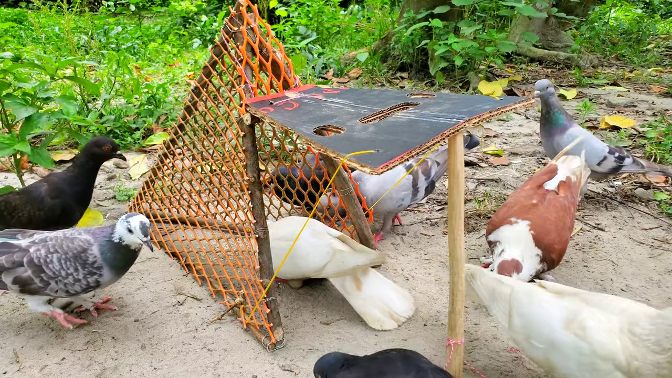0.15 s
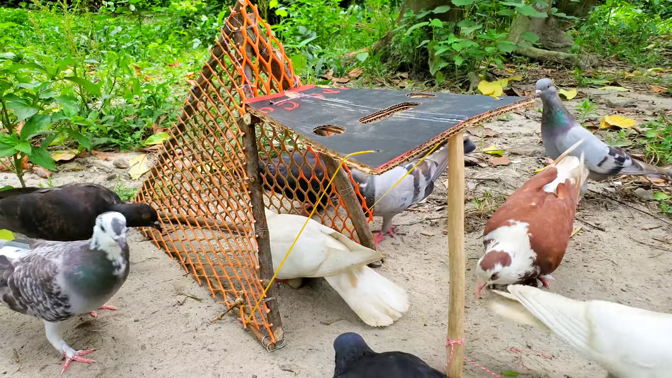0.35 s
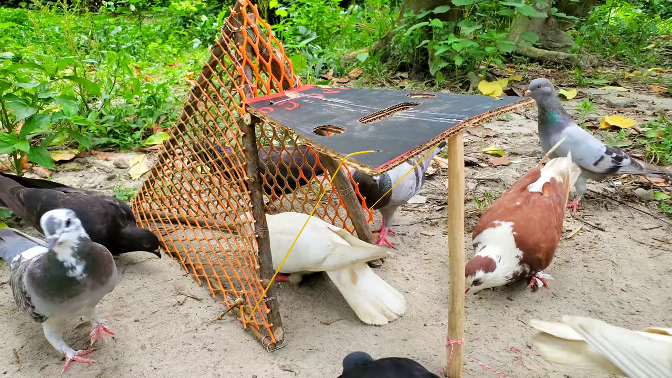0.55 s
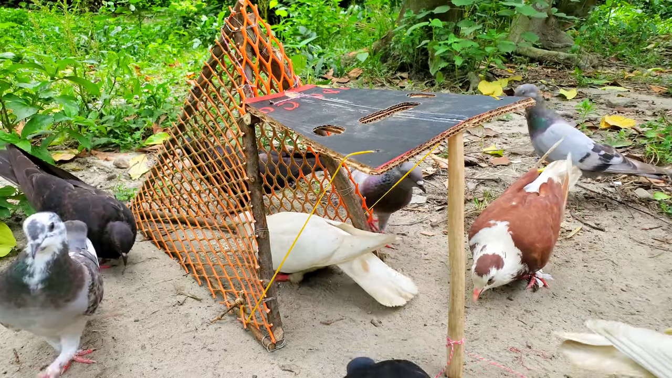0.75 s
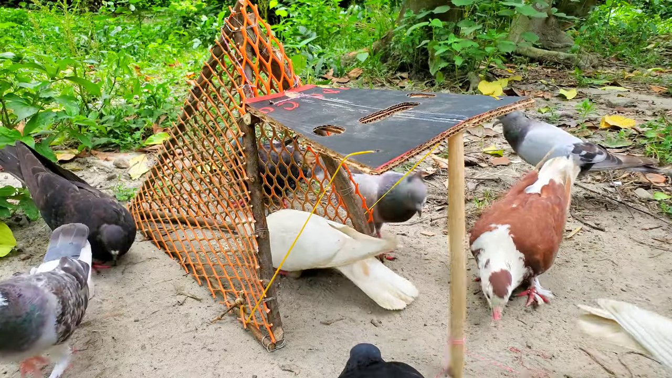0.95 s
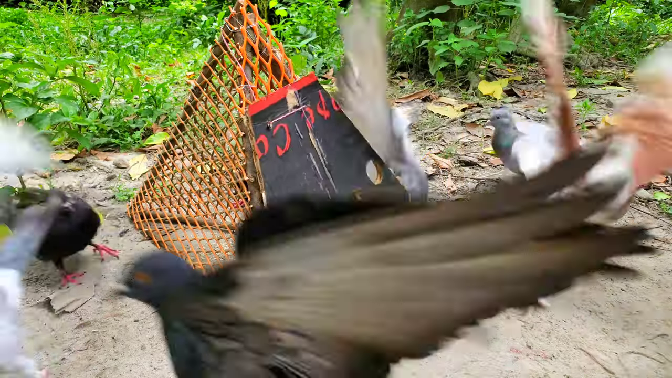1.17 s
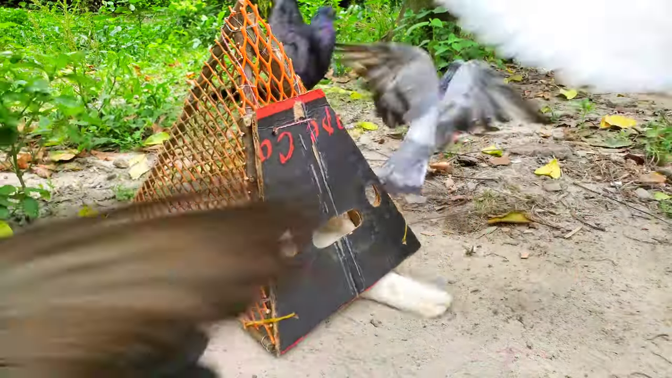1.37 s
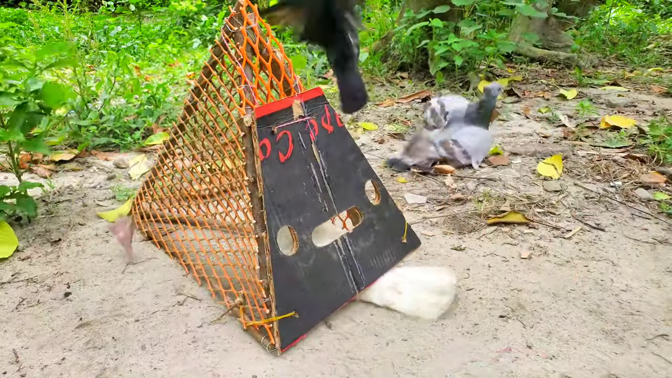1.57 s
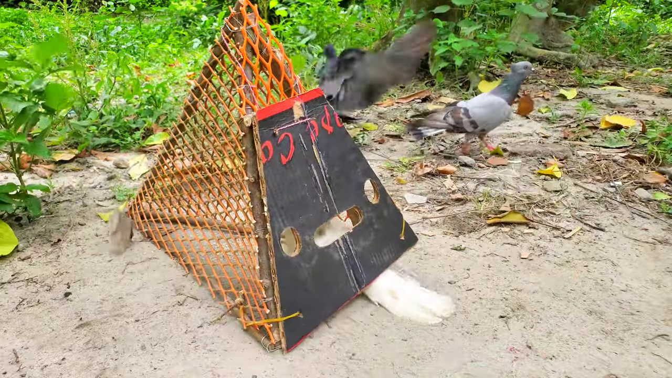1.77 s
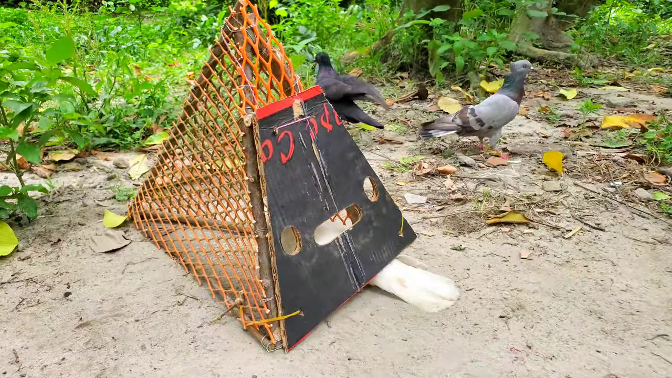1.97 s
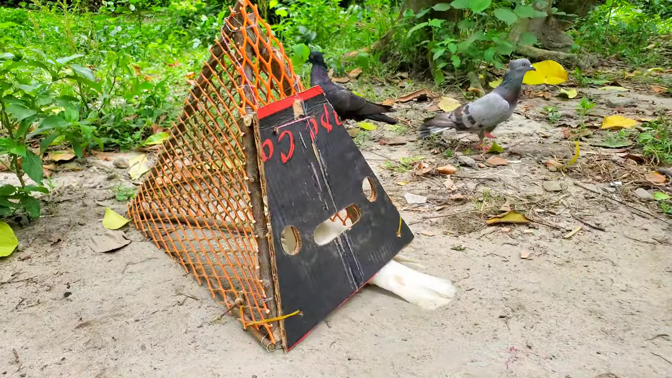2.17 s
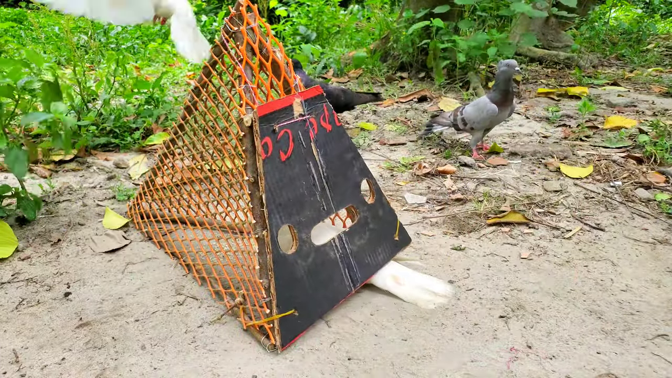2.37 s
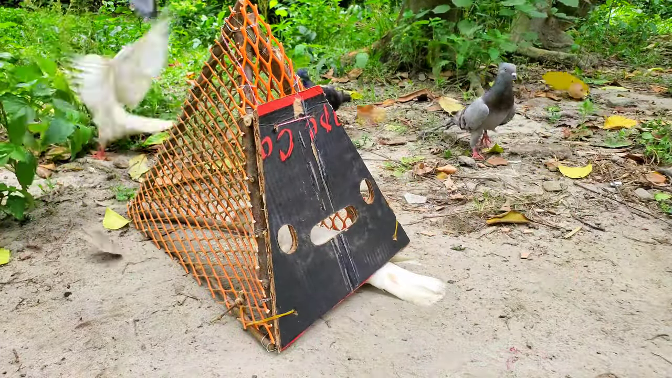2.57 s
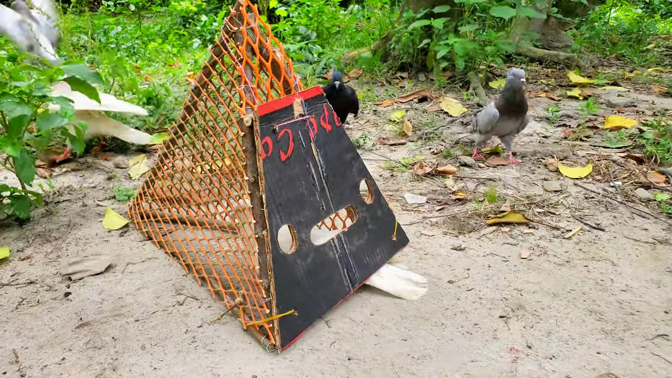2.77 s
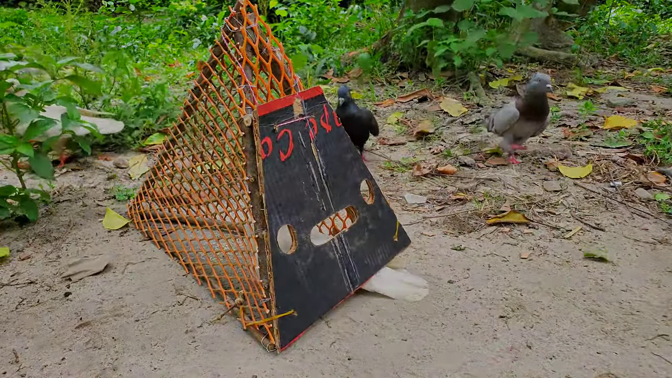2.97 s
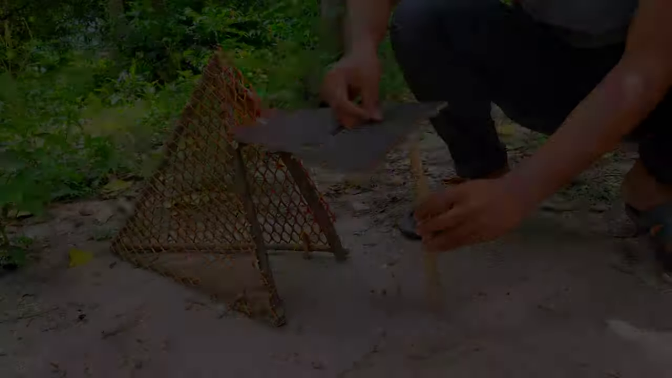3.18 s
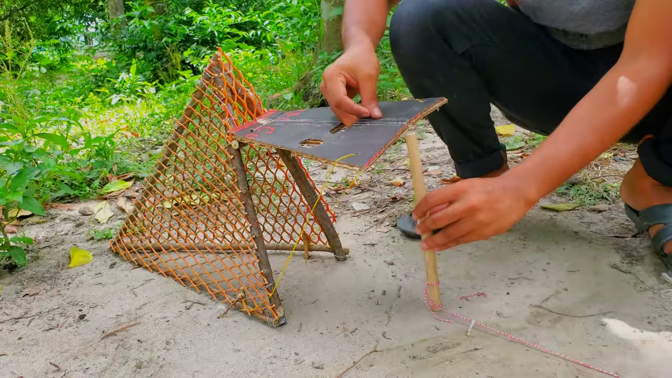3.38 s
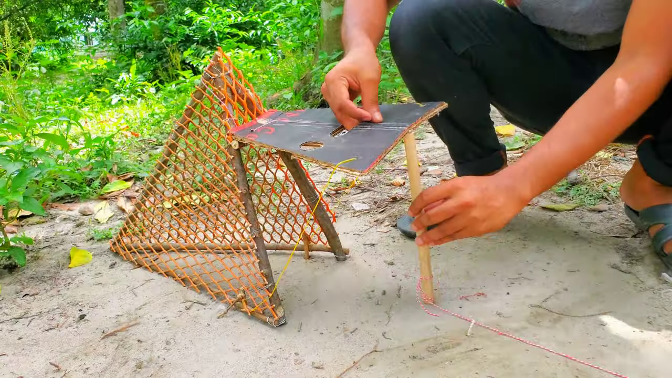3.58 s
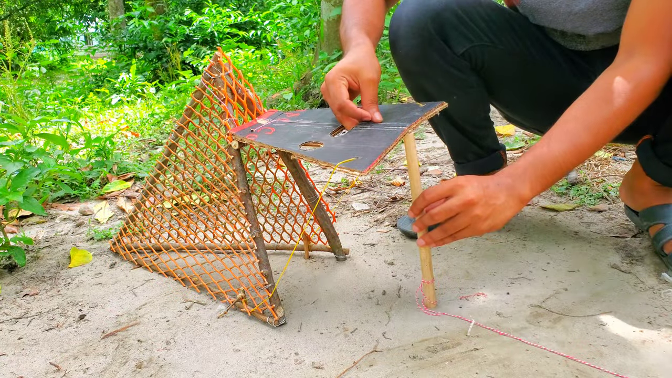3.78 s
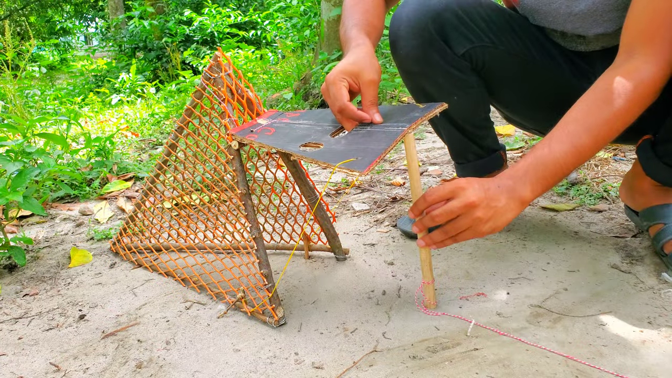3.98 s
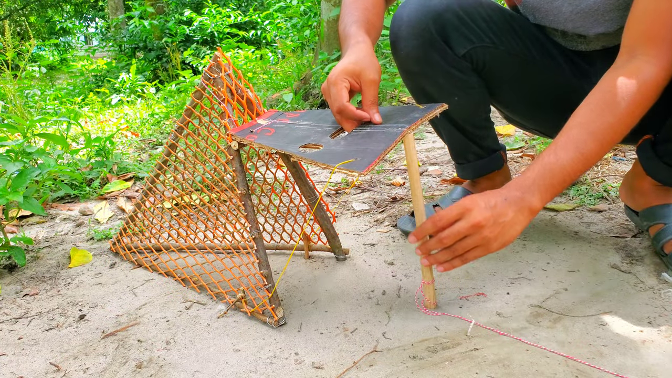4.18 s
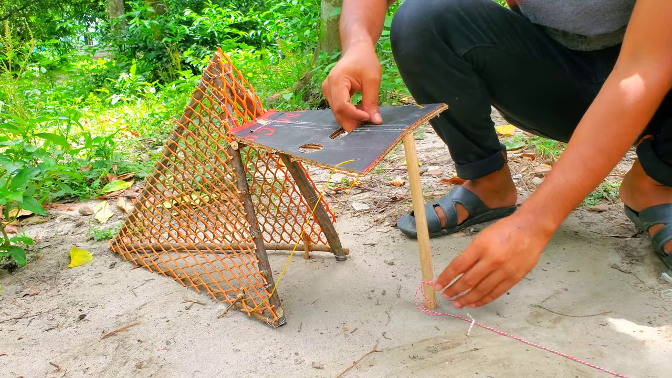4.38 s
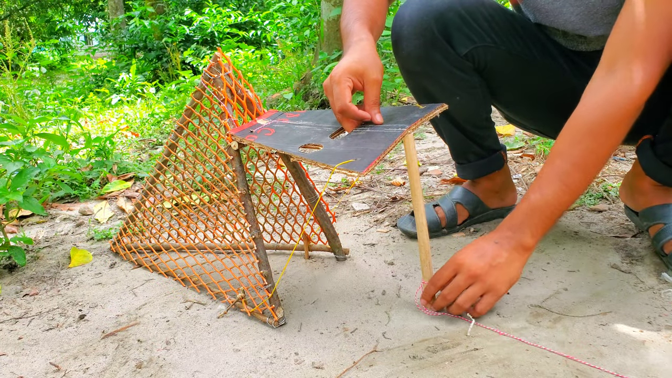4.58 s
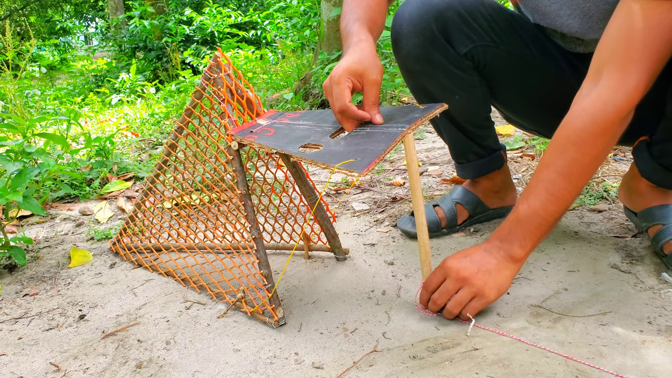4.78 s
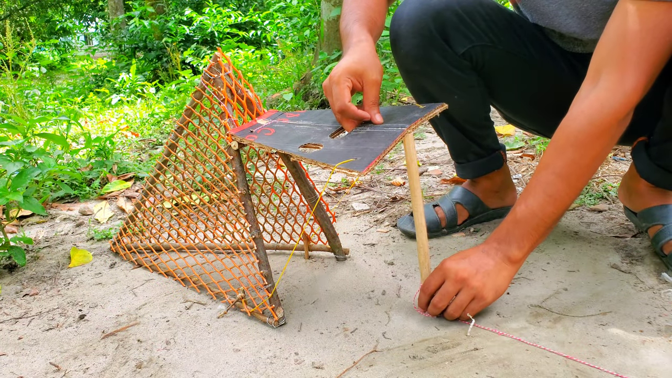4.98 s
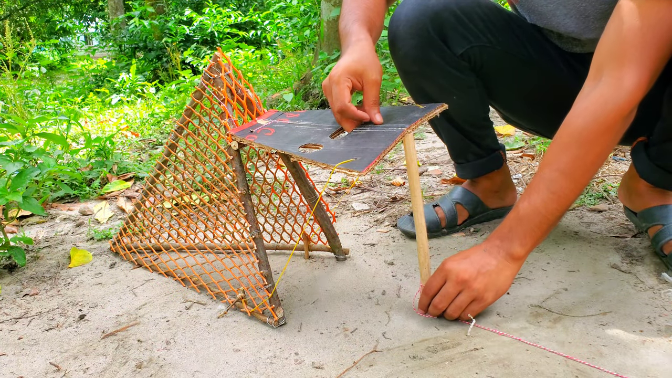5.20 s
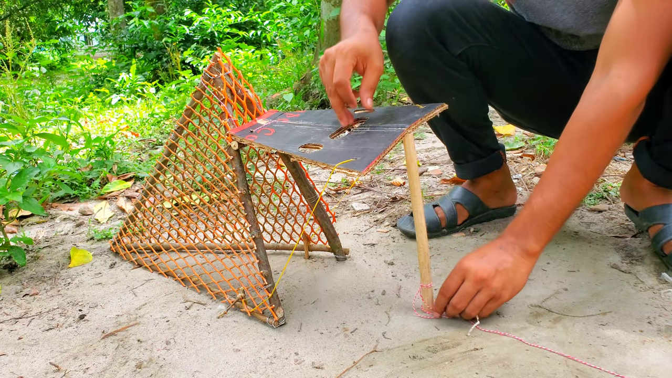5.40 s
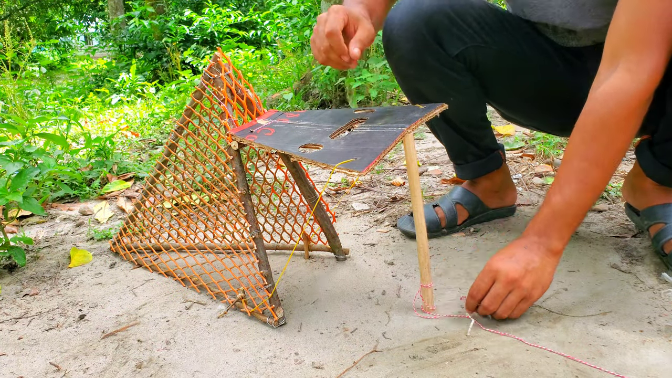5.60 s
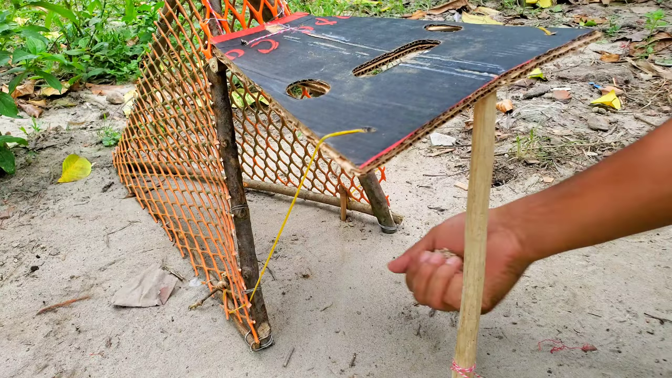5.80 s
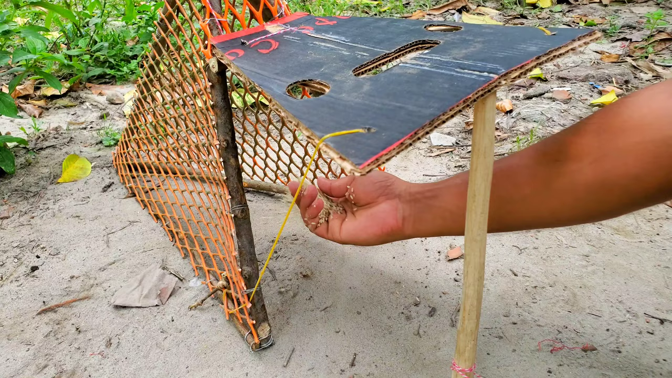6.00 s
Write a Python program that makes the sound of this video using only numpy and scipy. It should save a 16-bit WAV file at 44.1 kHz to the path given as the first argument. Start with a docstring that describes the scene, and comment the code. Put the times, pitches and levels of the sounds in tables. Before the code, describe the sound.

From 0 to 1 s it is very quiet: distant low rumble, faint leaf hiss, far twitter and one bird's short phrase repeating gradually louder, with slight rustling on sand. At about 1.07-1.12 s a thin board door lands in a rapid, dry, woody chatter. From 1.2 s pigeons explode upward very close: hard wing claps, dense feather rush and crackle, strongest around 1.2-1.6 s. Low pressure thumps buffet the microphone until about 1.9 s, some strongly left. Small flutters and rustles weaken until 3 s, while chirps emerge. The rumble dips away near 3.2 s, then returns with brighter leaf hiss. From 3.4 to 6 s small birds call busily: short falling slurs, rising hooks, thin whistles and peeps, mostly 2-8 kHz, with long echoes among trees. A sharp dry tick comes at 4.4 s, amid faint rustling.

```python
"""Low outdoor rumble, leaf hiss and far twitter come first: shaped noise and short gliding sines.
Small birds chirp in echoing trees: warbled sines, direct and through decaying noise echoes.
A stick is jerked away and the board door of a net trap slams on bare earth: damped modes, noise ticks.
Pigeons burst up close by: wing claps and feather rustle of decaying or patchy noise,
and downstrokes that push short pressure swings at the microphone."""
import sys
import numpy as np
from scipy import signal
from scipy.fft import rfft, irfft
from scipy.io import wavfile
from scipy.ndimage import uniform_filter1d

SR = 44100
rng = np.random.default_rng(int(sys.argv[2]) if len(sys.argv) > 2 else 0)


def digitize_waveform(pressure):
    """Quantize a signal to 16-bit integers and store it at the path in sys.argv[1].

    Rows of a 2-D input are taken as channels; values are limited to [-1, 1].
    """
    field = np.atleast_2d(pressure).T
    bounded = np.clip(field, -1, 1)
    quanta = np.round(bounded * 32767).astype(np.int16)
    wavfile.write(sys.argv[1], SR, quanta)


N = 266760
TIME_S = np.arange(N) / SR

# rumble level, with a brief dip [start_s, level_db]
RUMBLE_LEVEL = [(0, -55.5), (1, -53.5), (2.4, -56.5), (2.9, -60), (3.18, -84), (3.44, -55.5), (6.05, -50.5)]
# rumble spectrum [freq_hz, relative_db]
RUMBLE_SPECTRUM = [(20, -32), (48, 1), (84, 4.5), (130, -5.5), (200, -11), (344, -13), (555, -21),
                   (800, -31), (1200, -43), (2600, -73)]
# leaf hiss level [start_s, level_db]
BREEZE_LEVEL = [(0, -69.5), (.9, -62.5), (2.5, -62), (3.1, -65.5), (3.45, -54.5), (4.7, -54.5), (5, -53),
                (6.05, -50)]
# leaf hiss spectrum [freq_hz, relative_db]
HISS_SPECTRUM = [(300, -23), (600, -9), (1000, -7), (1500, -3.5), (4000, -0.5), (7000, -8), (10000, -28),
                 (16000, -41)]
# spells of rustling on sand and dry leaves [start_s, length_s, level_db]
SHUFFLES = [(0.77, 0.23, -65.5), (2.2, 0.86, -63.5), (3.335, 0.7, -68), (4.827, 0.52, -64.5),
            (5.276, 0.68, -68.5), (5.774, 0.21, -59.5)]
# rustle spectrum [freq_hz, relative_db]
RUSTLE_SPECTRUM = [(500, -18), (2000, 6.5), (6000, 5), (9000, 11.5), (12000, 2.5), (16000, -1)]
# echo decay among the trees [freq_hz, t60_s]
TREE_DECAY = [(300, 0.41), (2000, 1.54), (4000, 1.11), (7000, 0.58), (10000, 0.6)]
# farthest birds [start_s, level_db]
CHORUS_LEVEL = [(0, -78), (.4, -54.5), (1.1, -44), (1.9, -59), (2.4, -55.5), (3.2, -57), (3.6, -47.5),
                (4.8, -63), (6.05, -72)]
# held, warbling whistles [start_s, length_s, pitch_hz, echo_level_db, warble_share_of_pitch]
WHISTLES = [(0.113, 0.23, 4340, -65.5, 0.077), (.575, 0.097, 7000, -66, 0.008),
            (1.559, 0.092, 3706, -38, 0.065), (2.356, .04, 5960, -52, 0.047),
            (2.446, 0.19, 4750, -46, 0.085), (2.464, 0.023, 6820, -51, 0.036),
            (2.623, 0.18, 6960, -48, 0.03), (2.708, .05, 8920, -55.5, 0.0036),
            (2.787, 0.071, 8140, -39.5, .003), (3.084, 0.045, 3577, -44, 0.049),
            (3.305, 0.024, 4046, -34, .005), (3.68, .026, 4870, -34.5, 0.032),
            (3.986, 0.18, 7970, -42.5, 0.034), (3.992, 0.22, 7000, -43.5, 0.029),
            (4.267, 0.13, 7330, -41.5, 0.03), (5.015, 0.128, 3464, -37.5, 0.035),
            (5.026, 0.087, 2844, -38, 0.074), (5.575, 0.063, 2791, -33, 0.044),
            (5.82, 0.044, 2860, -34.5, 0.058)]
# short peeps of nearer birds [start_s, length_s, pitch_hz, echo_level_db]
PEEPS = [(2.074, 0.01, 3120, -38.5), (2.204, 0.011, 2755, -41), (2.624, .02, 7100, -40),
         (3.425, 0.032, 2440, -44), (5.12, 0.024, 4100, -47), (5.447, 0.026, 4020, -40),
         (6.012, 0.043, 3220, -32.5)]
# low sagging calls of large far birds [start_s, length_s, pitch_hz, echo_level_db]
HOOTS = [(.34, .18, 330.2, -61.5), (.55, 0.16, 303, -58.5), (3.28, 0.26, 1490, -62), (3.44, 0.19, 989, -66),
         (3.78, 0.064, 997, -60.5), (3.87, 0.28, 1428, -53.5), (4, 0.24, 924, -66.5),
         (4.5, 0.183, 339, -64.5), (4.97, 0.062, 975, -61), (5.63, .051, 1140, -62),
         (5.71, 0.15, 737, -64.5)]
# repeats of one far bird's phrase, each louder [start_s, echo_level_db]
PHRASES = [(.385, -59), (.572, -56), (.757, -49.5), (0.941, -48)]
# syllables [offset_s, length_s, from_hz, to_hz, relative_db, direct_over_echo_db]
SYLLABLES = [(-.03, .035, 4120, 3736, -2.5, 0.5), (0, .06, 2500, 5266, 4, -7.5),
             (0.053, .033, 3770, 1880, -2.5, 4)]
# slurs, fast at first [start_s, length_s, from_hz, to_hz, echo_level_db, direct_over_echo_db]
SLURS = [(1.129, 0.11, 4680, 3630, -44.5, -6), (1.369, 0.058, 3600, 3020, -40.5, 1),
         (2.005, 0.052, 3110, 2092, -44.5, -1), (2.144, 0.042, 2960, 1898, -45, -3.5),
         (2.607, 0.046, 5600, 7280, -37.5, -3), (2.766, 0.017, 2550, 2145, -50, 3),
         (2.847, 0.074, 7650, 5500, -37.5, -3), (3.123, 0.07, 3810, 4004, -40, 0.5),
         (3.269, 0.1, 3800, 2330, -46, 2.5), (3.47, 0.073, 2823, 3220, -35.5, -6),
         (3.778, 0.073, 4410, 3370, -30, 0.5), (3.827, .07, 3550, 2854, -32.5, 8),
         (3.854, 0.064, 5180, 3744, -31.5, -6), (3.969, 0.029, 5950, 8720, -34, -8),
         (3.989, 0.032, 3640, 2540, -35.5, -1), (4.062, 0.054, 3728, 2452, -34, -2),
         (4.254, .075, 6550, 6080, -40.5, -1), (4.332, 0.06, 2414, 2093, -39, -1.5),
         (4.379, 0.03, 12600, 9700, -44, -13), (4.64, 0.06, 2395, 2043, -38.5, 4.5),
         (4.706, 0.043, 2117, 1660, -47.5, 7), (4.831, 0.041, 3570, 5090, -40, 1),
         (5.174, 0.046, 3930, 4545, -35.5, 1), (5.198, 0.028, 4620, 5230, -38, -13),
         (5.24, 0.049, 2276, 3230, -42.5, 7), (5.257, .08, 2816, 2304, -34.5, 7.5),
         (5.315, 0.02, 1930, 1682, -38.5, -11), (5.478, 0.024, 2927, 4320, -35, 3),
         (5.505, 0.069, 2672, 2348, -32.5, 2), (5.669, 0.031, 2680, 1793, -36.5, -1),
         (5.717, 0.053, 7930, 4980, -34, -7.5), (5.801, 0.02, 2740, 1872, -38, 4.5),
         (5.852, 0.073, 7160, 5120, -35.5, -1), (5.921, 0.048, 2735, 2350, -38, -8),
         (5.985, 0.028, 3840, 2800, -29.5, -6)]
# rise-and-fall hooks [start_s, length_s, foot_hz, peak_hz, echo_level_db, direct_over_echo_db]
HOOKS = [(3.44, 0.11, 1784, 2427, -38.5, 1.5), (3.606, 0.084, 3680, 5090, -29, -5.5),
         (4.147, 0.11, 1703, 3298, -36, -1), (4.458, 0.051, 3440, 4674, -34, -1.5),
         (4.536, 0.056, 2354, 3450, -35.5, 0.5), (5.433, .085, 2600, 3970, -34.5, -1.5)]
# ticks and scuffs on ground and trap [start_s, level_db, centre_hz, decay_s]
TICKS = [(.859, -46, 6300, 0.004), (1.009, -43.5, 9700, 0.03), (1.405, -32, 630, 0.033),
         (1.46, -29.5, 704, 0.029), (1.525, -30, 585, 0.0049), (1.577, -28, 680, 0.012),
         (1.603, -29, 1260, 0.0045), (1.945, -48, 680, 0.018), (2.515, -50, 1460, 0.0029),
         (3.29, -37.5, 6100, 0.0011), (4.395, -27.5, 5650, 0.0023)]
# wingbeat strength: a burst, then stragglers [start_s, level_db]
FLOCK_LEVEL = [(.98, -29.5), (1.08, -17.5), (1.2, -3.5), (1.31, 3), (1.62, -10), (1.85, -21), (2.3, -20.5),
               (2.75, -32.5), (3.0, -42.5)]
# wing rush spectrum [freq_hz, relative_db]
RUSH_SPECTRUM = [(60, 8.5), (150, 0), (260, -1), (450, 0.5), (750, -1.5), (1500, -8.5), (3100, -6),
                 (5800, -22), (9000, -21), (16000, -45.5)]
# spectrum of feather fizz and door edge ticks [freq_hz, relative_db]
FIZZ_SPECTRUM = [(1000, -23), (2500, 0.5), (5000, 4.5), (8000, -4), (12000, 3), (16000, 2)]
# draught at the microphone as the birds pass [start_s, relative_db]
DRAUGHT_LEVEL = [(1, -72), (1.19, -38), (1.5, -28), (1.72, -30.5), (1.8, -43.5), (2.4, -51), (3, -83.5)]
# spectrum of moved air [freq_hz, relative_db]
AIR_SPECTRUM = [(20, -14.5), (50, -0.5), (100, 1.5), (160, -11), (260, -9.5), (420, -36), (1000, -61.5)]
# contacts of door and prop [start_s, thud_relative_db, edge_tick_db]
DOOR_HITS = [(1.0694, -31.5, -24), (1.0941, -31.5, -20), (1.1002, -11, -25), (1.102, -13, -8),
             (1.108, -12.5, -10.5), (1.1108, -12.5, -20.5), (1.1154, -18, -19), (1.1221, -20, -14)]
# board modes [freq_hz, relative_db, t60_s]
BOARD_MODES = [(124, -16.5, 0.24), (288, -17.5, 0.044), (398, -4.5, 0.012), (564, -1, 0.03),
               (745, -4, 0.027), (1020, -1.5, 0.01), (1355, 8, 0.0017), (2100, -22.5, 0.0065)]
# wing claps [start_s, snap_db, thump_db, snap_decay_s, left_over_right_db]
CLAPS = [(1.2096, -6, -32, .00084, 12.5), (1.239, -24, -12.5, 0.0026, 1), (1.2539, -15.5, -21, 0.003, -3),
         (1.2629, -11, -10, 0.0039, -1), (1.3173, -12, -5.5, 0.0022, -1), (1.378, -19.5, -20, .0032, 2),
         (1.429, -20, -18, 0.0081, -4), (1.576, -30, -16, 0.0058, -3), (1.602, -27, -17, .0023, -3),
         (1.947, -40, -61, .0069, -5), (2.066, -37.5, -42, 0.0067, 0.5), (2.291, -36, -53, 0.0019, -8),
         (2.314, -38, -47, 0.0052, 0.5), (2.384, -45.5, -36.5, 0.023, 0), (2.578, -50, -41, .0032, -2)]
# quill snap spectrum [freq_hz, relative_db]
SNAP_SPECTRUM = [(300, -11), (800, 18), (1500, 6.5), (3000, 7.5), (6500, 7), (9000, -2.5), (16000, 4)]
# squeezed-air thump spectrum [freq_hz, relative_db]
THUMP_SPECTRUM = [(30, -42), (100, 11.5), (300, 5), (700, -10), (1300, -7), (3000, -35), (8000, -59)]
# downstrokes [centre_s, level_db, gaussian_sigma_s, swing_hz, left_over_right_db]
STROKES = [(1.293, -12, 0.012, 93.5, -1.5), (1.401, -11, 0.013, 63, 0.5), (1.506, -13.5, 0.023, 55.6, -4.5),
           (1.606, -11.5, .029, 50, 11), (1.637, -8, 0.0063, 89.5, 30), (1.689, -8, 0.0087, 77.5, 19),
           (1.84, -20.5, 0.017, 58, 0), (1.885, -23.5, 0.0082, 58.4, -2), (2.035, -38, 0.0054, 69.6, 14)]

EDGE_HZ = 16100
RUSTLE_FLOOR_DB = -74.5
BEATS_PER_S, BEAT_DB = 8.9, -0.5
GRAIN_SPREAD_DB = 2.5


def gain_of(db):
    """Decibels to gain."""
    return 10 ** (np.asarray(db) / 20)


def evened(x):
    """Scales to rms 1."""
    return x / np.sqrt(np.mean(x ** 2) + 1e-20)


def read(points, hz):
    """Reads a table on a log-frequency axis."""
    table_hz, value = np.transpose(points)
    return np.interp(np.log(hz + 1), np.log(table_hz + 1), value)


def level(rows):
    """Level table to gain per sample, silent before its first row."""
    s, db = np.transpose(rows)
    return gain_of(np.interp(TIME_S, s, db)) * (TIME_S >= s[0])


def add(mix, start_s, sound):
    """Mixes a sound in at start_s."""
    part = mix[:, max(round(start_s * SR), 0):][:, :sound.shape[-1]]
    part += sound[..., :part.shape[1]]


def pan(left_over_right_db):
    """Left and right gains of equal total power."""
    half_db = left_over_right_db / 2
    return evened(gain_of([[half_db], [-half_db]]))


def wander(hz, size=N):
    """Slow chance of rms 1: random knots, hz of them a second, joined by lines."""
    knots = rng.standard_normal(4096)
    return evened(np.interp(np.arange(size) * hz / SR, np.arange(len(knots)), knots))


def colour(x, spectrum):
    """Filters x by a spectrum, to rms 1."""
    size = x.shape[-1]
    gain = gain_of(read(spectrum, np.fft.rfftfreq(size, 1 / SR)))
    return evened(irfft(rfft(x) * gain, size))


def noise(spectrum, apart, size=N):
    """Stereo noise: a shared part and an opposed part of relative size apart."""
    mid, side = rng.standard_normal((2, size))
    return colour(np.array([mid + apart * side, mid - apart * side]), spectrum)


def swirl(x, patchy_db=4.0):
    """Favours ever-changing pitches: patches some 300 Hz wide and 25 ms long."""
    z = signal.stft(x, SR, nperseg=512, noverlap=384)[2]
    patches = uniform_filter1d(rng.standard_normal(z.shape[1:]), size=4, axis=0)
    patches = evened(uniform_filter1d(patches, size=9, axis=1))
    patchy = signal.istft(z * gain_of(patchy_db * patches), SR, nperseg=512, noverlap=384)[1]
    return evened(patchy[:, :N])


def outdoors(lump_db=2.5, flick_db=2, shuffle_taper=0.4):
    """Lumpy distant rumble, faint leaf hiss and the dry rustle of small movements on sand."""
    lumps = gain_of(lump_db * wander(9.8))
    rumble = level(RUMBLE_LEVEL) * lumps * noise(RUMBLE_SPECTRUM, 0.23)
    hiss = level(BREEZE_LEVEL) * swirl(noise(HISS_SPECTRUM, 0.97), patchy_db=6.5)
    rustle_gain = np.full((1, N), gain_of(RUSTLE_FLOOR_DB))
    for start_s, length_s, db in SHUFFLES:
        add(rustle_gain, start_s, gain_of(db) * signal.windows.tukey(round(length_s * SR), shuffle_taper))
    flicks = gain_of(flick_db * wander(90))
    return rumble + hiss + rustle_gain * flicks * noise(RUSTLE_SPECTRUM, 0.15)


def trees(x, early_db=-5):
    """Trunks and leaves scatter sound: a few early echoes and a long tail, different at each ear."""
    t = np.arange(SR) / SR
    hz, frame_s, z = signal.stft(rng.standard_normal((2, SR)), SR, nperseg=256)
    decay = gain_of(-60 * frame_s / read(TREE_DECAY, hz)[:, None])
    tail = signal.istft(z * decay, SR, nperseg=256)[1][:, :SR]
    tail *= 1 - np.exp(-t / 0.012)
    tail /= np.linalg.norm(tail[0])
    for ear in tail:
        echo_at = (rng.uniform(.008, .07, 8) * SR).astype(int)
        ear[echo_at] += gain_of(early_db) * rng.choice([-1, 1], 8) / np.sqrt(8)
    return signal.fftconvolve(x[None], tail, axes=1)[:, :N]


def chorus(count=240, low_hz=3200, high_hz=4500, glide=0.18, left_db=2):
    """Many tiny twitters from deep in the trees, sliding up or down, heard only as echo."""
    song, u = np.zeros((1, N)), np.linspace(-1, 1, round(0.018 * SR))
    for k, (late, pitch, slope) in enumerate(rng.random((count, 3))):
        centre_hz = low_hz + pitch * (high_hz - low_hz)
        hz = centre_hz * (1 + glide * np.sign(slope - .5) * u)
        twitter = np.sin(2 * np.pi * np.cumsum(hz) / SR) * (1 - u ** 2)
        add(song, (k + late) / count * N / SR, twitter)
    return pan(left_db) * level(CHORUS_LEVEL) * evened(trees(song[0]))


def progress(length_s):
    """Runs from 0 to 1 over a note."""
    return np.linspace(0, 1, round(length_s * SR))


def note(hz, db, warble, waver=0.005, flutter_db=2, overtone_db=-52, warble_hz=115):
    """Near sine on a pitch path; warble and waver are shares of the pitch, the level flutters."""
    size = len(hz)
    warble_phase = 2 * np.pi * warble_hz * np.arange(size) / SR + wander(90, size=size)
    shake = waver * wander(496, size=size) + warble * np.sin(warble_phase)
    phase = 2 * np.pi * np.cumsum(hz * (1 + shake)) / SR
    swell = gain_of(db + flutter_db * wander(180, size=size)) * signal.windows.tukey(size, .3)
    return np.sqrt(2) * swell * (np.sin(phase) + gain_of(overtone_db) * np.sin(2 * phase))


def whistles(direct_db=0.5):
    """One held pitch, pure or trilled."""
    for start_s, length_s, hz, db, warble in WHISTLES:
        yield start_s, note(np.full(round(length_s * SR), hz), db, warble), direct_db


def held(rows, sag, warble, direct_db):
    """Notes on one pitch that sinks by the share sag."""
    for start_s, length_s, hz, db in rows:
        path_hz = hz * (1 + sag * (.5 - progress(length_s)))
        yield start_s, note(path_hz, db, warble), direct_db


def phrases(warble=0.046):
    """Peep, upsweep, downsweep, over and over."""
    for phrase_s, phrase_db in PHRASES:
        for offset_s, length_s, from_hz, to_hz, db, direct_db in SYLLABLES:
            path_hz = from_hz + (to_hz - from_hz) * progress(length_s)
            yield phrase_s + offset_s, note(path_hz, phrase_db + db, warble), direct_db


def slurs(ease=1.5, warble=0.019):
    """The pitch eases into its final value."""
    for start_s, length_s, from_hz, to_hz, db, direct_db in SLURS:
        path_hz = to_hz + (from_hz - to_hz) * (1 - progress(length_s)) ** ease
        yield start_s, note(path_hz, db, warble), direct_db


def hooks(peak_at=.42, sharpness=0.93, warble=0.026, swell_db=3):
    """The pitch climbs to a pointed peak and drops again, louder on the way down."""
    for start_s, length_s, foot_hz, peak_hz, db, direct_db in HOOKS:
        u = progress(length_s)
        away = np.interp(u, [0, peak_at, 1], [1, 0, 1])
        path_hz = peak_hz + (foot_hz - peak_hz) * away ** sharpness
        yield start_s, note(path_hz, db + swell_db * (u - .5), warble), direct_db


def chirps(left_db=5.0):
    """Birds on three perches: each note arrives directly and with its perch's own echoes."""
    peeps = held(PEEPS, sag=0.023, warble=0.013, direct_db=6)
    hoots = held(HOOTS, sag=0.037, warble=.035, direct_db=1.0)
    songs = [*phrases(), *slurs(), *hooks(), *whistles(), *peeps, *hoots]
    perches, direct = np.zeros((3, 1, N)), np.zeros((2, N))
    for k, (start_s, sound, direct_db) in enumerate(songs):
        add(perches[k % 3], start_s, sound)
        direct_sound = gain_of(direct_db) * sound
        ear_delay_s = rng.uniform(-0.00037, 0.00045)  # small random delay between the ears for each note
        add(direct[:1], start_s, direct_sound)
        add(direct[1:], start_s + ear_delay_s, direct_sound)
    return pan(left_db) * (direct + sum(trees(perch[0]) for perch in perches))


def ticks(skirt_db=-22):
    """Brief dry snaps: decaying noise, each around its own pitch."""
    out, t = np.zeros((2, N)), np.arange(8192) / SR
    for start_s, db, hz, decay_s in TICKS:
        spectrum = [(hz / 8, 2 * skirt_db), (hz / 2, skirt_db / 2), (hz, 0),
                    (hz * 2, skirt_db), (hz * 8, 2 * skirt_db)]
        add(out, start_s, gain_of(db) * np.exp(-t / decay_s) * noise(spectrum, 0.13, size=8192))
    return out


def feathers(rush_db=-29, fizz_db=-35, crackle_db=-39, air_db=-2, flutter_db=2.0, grains_per_s=700):
    """Beating wings rush through the air; vanes and dry leaves flick in dense tiny grains."""
    beat = BEAT_DB * np.cos(2 * np.pi * BEATS_PER_S * (TIME_S - CLAPS[0][0]))
    flutter = gain_of(flutter_db * wander(70) + beat)
    struck = rng.random((2, N)) < grains_per_s / SR
    grains = struck * gain_of(GRAIN_SPREAD_DB * np.minimum(rng.exponential(1, (2, N)), 4))
    crackle = gain_of(crackle_db) * colour(grains + 1.1 * grains[::-1], FIZZ_SPECTRUM)
    fizz = gain_of(fizz_db) * swirl(noise(FIZZ_SPECTRUM, 0.16), patchy_db=5.0)
    rush = gain_of(rush_db) * swirl(noise(RUSH_SPECTRUM, 0.78))
    wings = level(FLOCK_LEVEL) * flutter * (rush + fizz + crackle)
    draught = gain_of(air_db) * level(DRAUGHT_LEVEL) * noise(AIR_SPECTRUM, 0.51)
    left_over_right_db = np.interp(TIME_S, [1.25, 1.7], [-1, 3])  # the flock leaves to the left
    return gain_of(left_over_right_db * np.array([[.5], [-.5]])) * (wings + draught)


def door(tick_decay_s=0.0012, ring_db=-2, apart_rad=0.34):
    """The board lands and chatters: each contact rings its damped modes and its edge ticks."""
    out, t = np.zeros((2, N)), np.arange(6000) / SR
    for start_s, thud_db, tick_db in DOOR_HITS:
        ring = np.zeros((2, 6000))
        for hz, db, t60_s in BOARD_MODES:
            phase = 2 * np.pi * hz * t + apart_rad * rng.standard_normal((2, 1))
            ring += gain_of(db - 60 * t / t60_s) * np.sin(phase)
        tick = np.exp(-t / tick_decay_s) * noise(FIZZ_SPECTRUM, 0.92, size=6000)
        add(out, start_s, gain_of(thud_db + ring_db) * ring + gain_of(tick_db) * tick)
    return out


def claps(thump_decay_s=0.0031, thump_rise_s=0.00067):
    """Wing tips meet: a sharp snap of quills and a thump of squeezed air."""
    out, t = np.zeros((2, N)), np.arange(4096) / SR
    thump_shape = np.exp(-t / thump_decay_s) * (1 - np.exp(-t / thump_rise_s))
    for start_s, snap_db, thump_db, decay_s, side_db in CLAPS:
        snap = gain_of(snap_db) * np.exp(-t / decay_s) * noise(SNAP_SPECTRUM, 1.0, size=4096)
        thump = gain_of(thump_db) * thump_shape * noise(THUMP_SPECTRUM, 0.12, size=4096)
        add(out, start_s, pan(side_db) * (snap + thump))
    return out


def downstrokes(eddy_db=-6, swing_db=-6.5):
    """Each stroke pushes a short pressure swing at the microphone, with eddies in it."""
    out, t = np.zeros((2, N)), (np.arange(8192) - 4096) / SR
    for centre_s, db, sigma_s, hz, side_db in STROKES:
        swing = np.sqrt(2) * np.cos(2 * np.pi * hz * t + .5 * rng.standard_normal((2, 1)))
        eddies = noise(AIR_SPECTRUM, 0.59, size=8192)
        air = gain_of(swing_db) * swing + gain_of(eddy_db) * eddies
        push = gain_of(db) * np.exp(-(t / sigma_s) ** 2 / 2)
        add(out, centre_s + t[0], pan(side_db) * push * air)
    return out


def scene(near_echo_db=-24):
    """Near sounds are almost dry; the songbirds carry long echoes."""
    near = ticks() + feathers() + door() + claps()
    near_echo = gain_of(near_echo_db) * trees(near.mean(0))
    return outdoors() + chorus() + chirps() + near + near_echo + downstrokes()


def record(dry):
    """A quick fade-in; peaks stop at full scale; then the band limit."""
    faded = dry * np.interp(TIME_S, [.03, .055], [0, 1])
    lowpass = signal.firwin(511, EDGE_HZ, window=("kaiser", 9), fs=SR)
    return signal.oaconvolve(np.clip(faded, -1, 1), lowpass[None], "same")


dry = scene()
out = record(dry)
digitize_waveform(out)
```